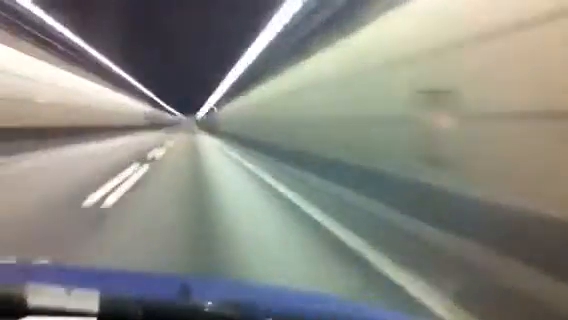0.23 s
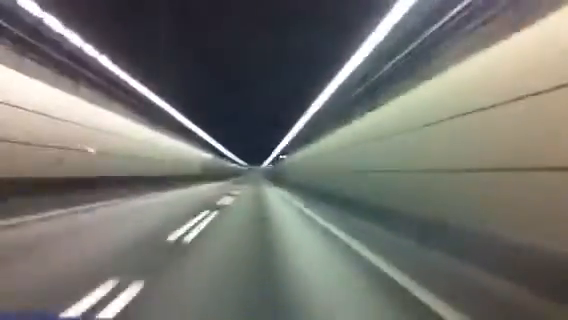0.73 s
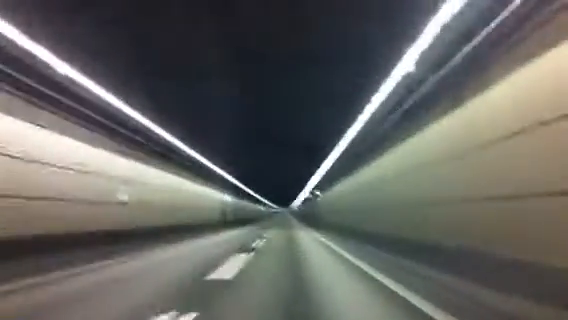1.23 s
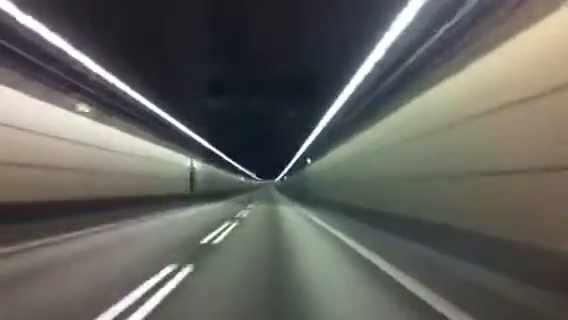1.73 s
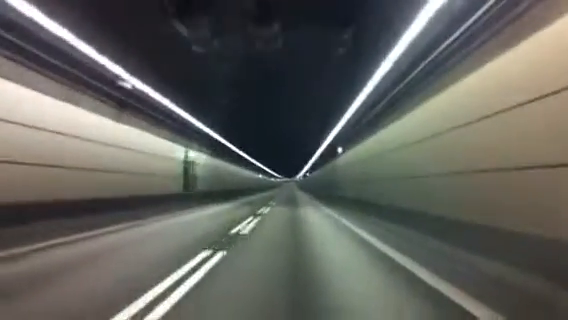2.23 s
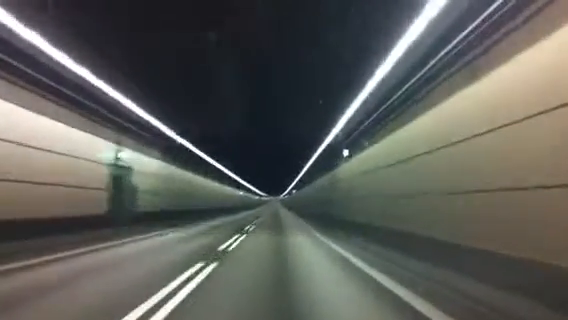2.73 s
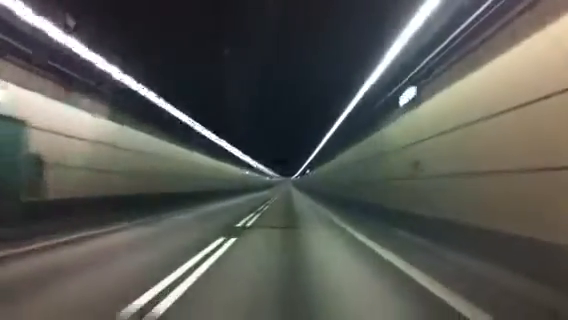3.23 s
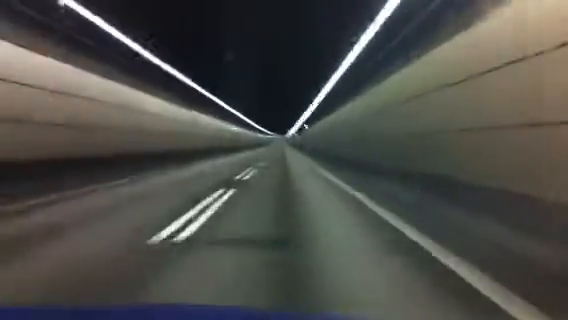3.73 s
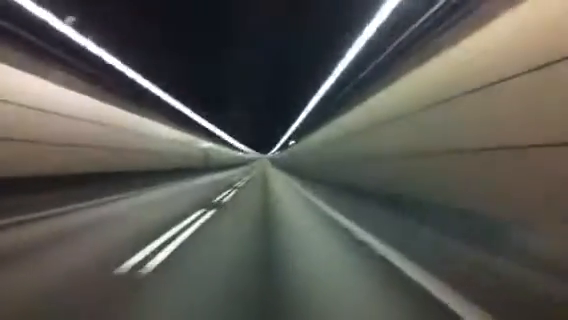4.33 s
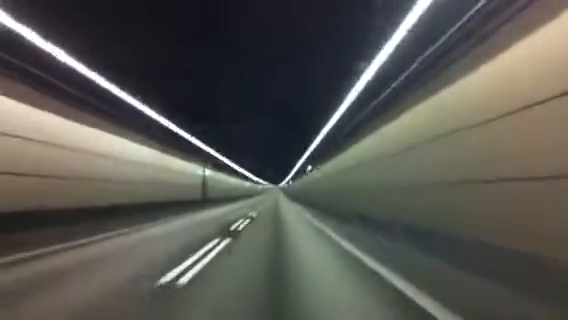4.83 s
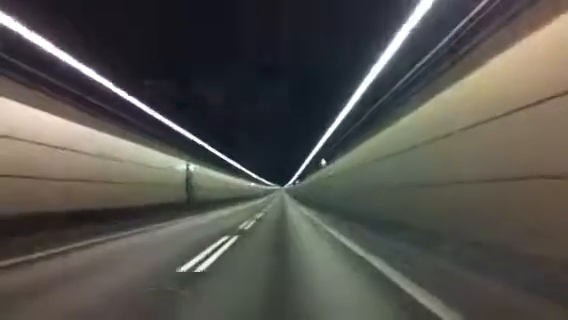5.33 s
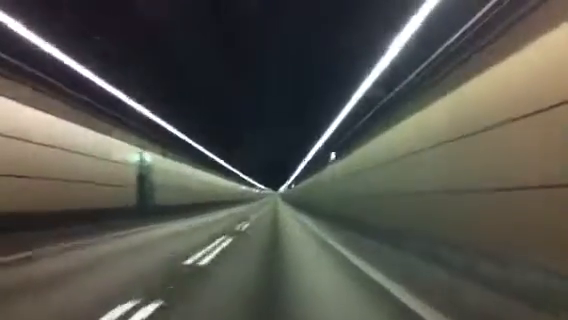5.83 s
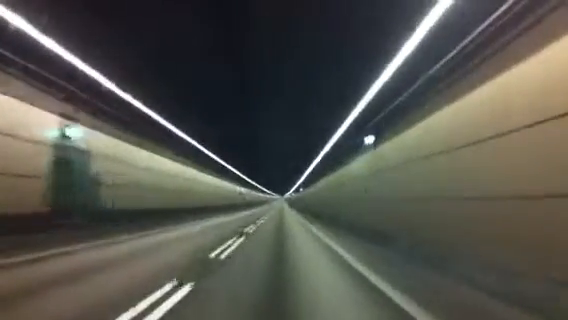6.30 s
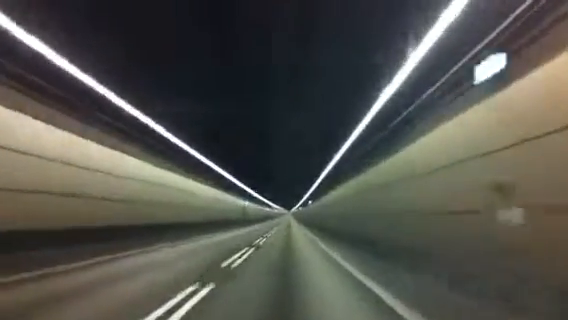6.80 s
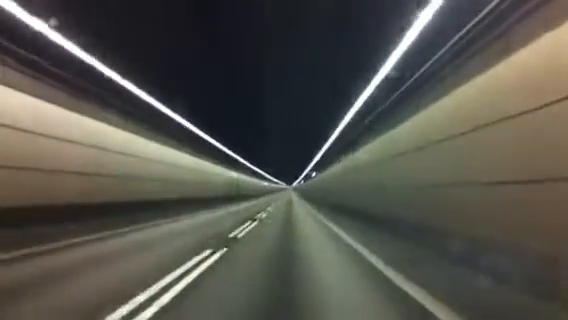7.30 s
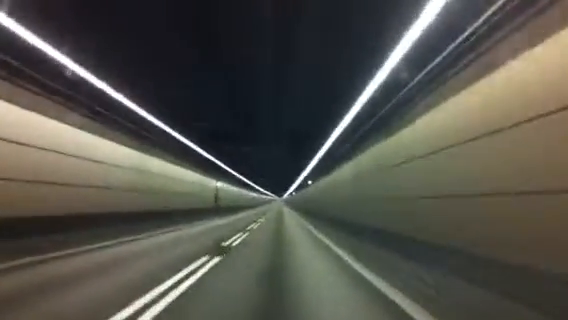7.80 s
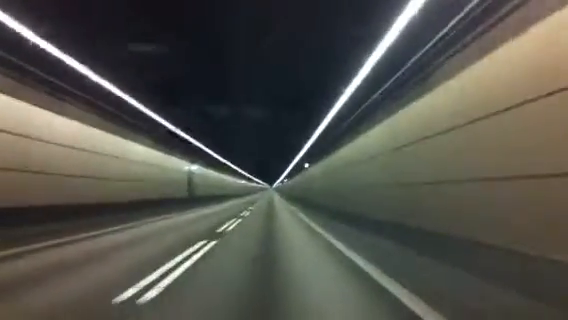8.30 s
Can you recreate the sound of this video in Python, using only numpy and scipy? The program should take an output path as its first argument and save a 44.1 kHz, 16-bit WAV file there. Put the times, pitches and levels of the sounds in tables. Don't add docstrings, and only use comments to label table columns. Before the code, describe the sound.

Inside a car speeding through a road tunnel: deep steady cabin boom and tyre roar, faint airy hiss, and a small bunch of metal jingling in quick light shakes.

```python
import sys
import numpy as np
from scipy import signal
from scipy.fft import rfft, irfft
from scipy.io import wavfile
from scipy.ndimage import uniform_filter1d, minimum_filter1d

SR = 44100
rng = np.random.default_rng(int(sys.argv[2]) if len(sys.argv) > 2 else 0)


def materialize(psi):
    bounded = np.clip(np.atleast_2d(psi).T, -1, 1)
    quanta = np.round(bounded * 32767).astype(np.int16)
    wavfile.write(sys.argv[1], SR, quanta)


def magnitude_from_level(level_db):
    exponent = np.asarray(level_db, float) / 20
    return 10 ** exponent


N = 377055
TIME = np.arange(N) / SR
HZ = np.fft.rfftfreq(N, 1 / SR)

# (dB per dB of road shake, dB gained when lifted, dB gained on coarse asphalt)
THUD, BOOM, UPPER, DRONE = (0.68, .3, 1.3), (0.84, 0.42, -1.5), (1.0, .3, 0.64), (0.52, -1.2, 1)
GLASS, ROAR, SIZZLE = (0.32, 3.7, 0.3), (0.041, 3.3, 0.23), (.05, 8.6, 0.47)
HIGH_HUM, LOW_HUM = (.3, 3.3, -1.0), (0.52, 2, 0.52)
RUSH, HISS, TOP = (.05, 2.7, 0.95), (.05, .1, .3), (.05, .1, .1)


def level(x, db):
    return x * magnitude_from_level(db) / np.sqrt(np.mean(x ** 2))


def curves(table):
    s, *columns = np.transpose(table)
    return [np.interp(TIME, s, column) for column in columns]


def step(at_s, fade_s):
    return np.clip((TIME - at_s) / fade_s + .5, 0, 1)


def swell(at_s, length_s):
    return np.exp(-((TIME - at_s) / length_s) ** 2)


def walk(rate):
    hold = int(SR / rate)
    levels = np.repeat(rng.standard_normal(N // hold + 1), hold)
    smooth = uniform_filter1d(uniform_filter1d(levels, hold), hold)
    return 1.25 * smooth[:N]


def follow(layer):
    # (time [s], shake [dB])
    road = [(0, -32.5), (.5, -34.5), (1.2, -35), (2.0, -31.5), (2.5, -33), (3.4, -31.5), (4.4, -31),
            (5.5, -31.5), (6.0, -32), (6.5, -34.5), (7.0, -32.5), (7.6, -32), (8.55, -31)]
    # (time [s], share in view of the glass [0-1])
    lift = [
        (0, 0),
        (.42, 0.07),
        (.6, 0.56),
        (1.1, 0.9),
        (1.7, 0.81),
        (3.7, 0.88),
        (5.3, 0.86),
        (6.2, 1.09),
        (8.55, 0.92),
    ]
    per_shake, lifted, coarse = layer
    shake = curves(road)[0]
    height = curves(lift)[0]
    coarser = step(3.53, fade_s=0.22)
    return per_shake * (shake - shake.mean()) + lifted * (height - 1) + coarse * coarser


def colour(points):
    hz, db = np.transpose(points)
    return np.interp(np.log(HZ + 1), np.log(hz), db)


def resonance(hz, width):
    return 1 / (1 + (2 * (HZ - hz) / width) ** 2)


def cabin():
    # (frequency [Hz], level [dB])
    broad = [(15, -72), (27, -35), (64, -23.5), (117, -5.5), (224, 1), (267, -3), (450, -9), (524, -11.5),
             (637, -8.5), (741, -10), (1520, -25), (2500, -28.5), (3540, -42.5), (4500, -51.5), (5850, -81),
             (9900, -120)]
    # (frequency [Hz], width [Hz], level over the colour [dB])
    modes = [(96, 7, 3.5), (124.5, 15.5, 5.5), (170.8, 31, 3.5), (199, 13, -3), (219.5, 12, 1.5),
             (267, 3.8, -5), (455, 81, 2), (525, 32, -3.5), (579, 24, 3.5), (595, 29, -6), (650, 32, 0.5),
             (719, 48, -3), (727, 26, 4), (787, 34, 2.5), (780, 18, 0), (850, 15, -2.5), (863, 30, 3),
             (950, 18, 5.5), (1166, 43, -3.5), (1220, 18, 1.5), (1320, 110, 0.1), (1553, 140, -2.5),
             (2100, 91, -3), (2220, 160, 2.5), (2760, 330, 3)]
    return colour(broad) + sum(db * resonance(hz, width) for hz, width, db in modes)


def noise(db, lo_hz, hi_hz, patchy_db, rate):
    def edge(hz):
        return np.clip(np.log2((HZ + 1) / hz) * 3 + .5, 0, 1)

    out = np.zeros(N)
    count = max(int(3 * np.log2(hi_hz / lo_hz)), 1)
    borders = np.geomspace(lo_hz, hi_hz, num=count + 1)
    for low, high in zip(borders, borders[1:]):
        strip = magnitude_from_level(db) * np.sqrt(np.maximum(edge(low) - edge(high), 0))
        wander = magnitude_from_level(patchy_db * walk(rate))
        out += wander * irfft(strip * rfft(rng.standard_normal(N)), N)
    return out


def played(db, zones, patchy_db, rate):
    return sum(magnitude_from_level(line - np.mean(line)) * noise(db, lo, hi, patchy_db, rate) for lo, hi, line in zones)


def body():
    zones = [(15, 100, follow(THUD)), (100, 190, follow(BOOM)), (190, 300, follow(UPPER))]
    return level(played(cabin(), zones, patchy_db=0.4, rate=3.6), -29.5)


def tyres():
    zones = [(300, 600, follow(DRONE)), (600, 1150, follow(GLASS)),
             (1150, 2050, follow(ROAR)), (2050, 3000, follow(SIZZLE))]
    return level(played(cabin(), zones, patchy_db=0.66, rate=1.457), -32.5)


def hums():
    near = swell(2.2, length_s=3.2)
    out = 0
    for layer, near_db, hz, width in [(HIGH_HUM, 8, 730.0, 29), (LOW_HUM, 5.5, 648, 18)]:
        ring = irfft(rfft(rng.standard_normal(N)) * resonance(hz, width), N)
        out = out + level(ring, -51.5) * magnitude_from_level(follow(layer) + near_db * near + 0.33 * walk(1.8))
    return out


def ridges():
    # (frequency [Hz], width [Hz], time [s], length [s], level [dB])
    swelling_bands = [(2426, 200, 1.37, 0.9, -55), (2290, 100, 3, 0.62, -68), (2410, 140, 4, .6, -56),
                      (1790, 170, 3.4, 1.3, -68), (1900, 140, 6.2, 2.2, -56.5), (638, 26, 5.44, 0.41, -46),
                      (644, 25, 7.83, 0.64, -45), (727, 15, 2.56, 0.53, -41), (2010, 300, .8, .3, -55),
                      (920, 56, 2.96, 0.22, -49), (179, 20, 1.36, 0.64, -37.5), (260, 50, 7.73, 0.53, -44),
                      (404, 130, 2.75, 0.78, -47), (1060, 120, 2.4, .9, -52), (1080, 200, 3.05, 0.13, -48),
                      (425, 60, 1.7, 1.04, -50), (274, 62, 7.56, 0.22, -36), (205, 32, 7.07, .15, -40),
                      (725, 12, 1.2, 0.52, -48), (787, 11, .95, 0.35, -47.5), (790, 16, 2.4, 0.38, -46.5),
                      (638, 25, 1.57, .15, -43), (760, 30, 2.9, 0.28, -46), (2280, 120, 1.02, .2, -57),
                      (2280, 120, 2, 0.21, -59), (580, 20, 6.6, 2.5, -51.5), (1320, 170, 5.9, 1.8, -59),
                      (2480, 90, 1.4, .4, -59), (202, 36, 1.81, 0.14, -40), (3400, 550, 3, .6, -71)]
    steady = .6
    out = 0
    for hz, width, s, length, db in swelling_bands:
        ring = irfft(rfft(rng.standard_normal(N)) * resonance(hz, width), N)
        flutter = np.sqrt(uniform_filter1d(ring ** 2, size=int(4 * SR / hz))) + 1e-9
        out = out + level(ring / flutter ** steady, db) * swell(s, length)
    return out


def air():
    # (frequency [Hz], level [dB])
    seal_colour = [(2350, -30), (4000, 3.5), (4620, -1.5), (6360, -4.5), (9220, -8.5), (15100, -9.5),
                   (15700, -10)]
    # (time [s], hiss gain [dB])
    jolts = [(.004, 4.5), (1.46, 2), (1.885, 3), (1.935, 1), (2.52, 3.5), (2.575, 1.5), (3.32, 3), (3.8, 3),
             (4.33, 2), (4.36, 3), (4.395, 5.5), (4.43, 1.5), (5.86, 2.5), (5.93, 5)]
    # (time [s], level [dB])
    draughts = [(0.0, -65.5), (0.12, -64), (0.62, -65.5), (1.07, -65), (1.43, -68), (1.88, -68.5),
                (2.19, -70), (3.95, -68), (4.14, -69), (4.57, -68), (4.98, -69.5), (6.12, -68),
                (8.19, -68.5), (8.55, -69.5)]
    jolt = sum(db * swell(s, length_s=0.017) for s, db in jolts)
    jolt = jolt * (1 + .2 * walk(200)) + walk(17) / 4
    vent = 3 * (1 - step(1.4, fade_s=0.42))
    draught = curves(draughts)[0]
    hiss = 0.79 * draught + jolt + follow(HISS)
    top = draught + 1.3 * jolt + follow(TOP)
    rush = vent + 0.87 * jolt + follow(RUSH)
    seals = played(colour(seal_colour), [(4400, 9000, hiss), (9000, 17000, top)], patchy_db=.6, rate=6)
    glass = played(cabin(), [(3000, 4400, rush)], patchy_db=.4, rate=5)
    return level(seals, -63.0) + level(glass, -60.5)


def shakes():
    # (time [s], ring level [dB],
    # loudest ring [Hz], high ring over it [dB], low ring over it [dB])
    bunch_shakes = [(0.045, -61.9, 11400.0, -6.8, -2.4), (0.112, -56, 11500, -8.4, -1),
                    (0.224, -57.8, 11100.0, -6.7, -2.3), (0.282, -60.6, 10400, -4.1, -1.7),
                    (0.331, -59.4, 11600.0, -6.6, -10.6), (0.395, -66.0, 12600.0, -2.1, -1.3),
                    (0.45, -64.9, 11700.0, -6.0, -5.5), (0.64, -60.9, 11700.0, -8.5, -7.4),
                    (0.74, -67.0, 12100.0, -2.6, -0.6), (0.822, -67.5, 12000.0, -0.1, 0.2),
                    (0.878, -67.3, 9900.0, -1.1, 6), (0.905, -69.3, 9900.0, 2.3, 1.5),
                    (0.977, -62.8, 12300.0, -8.6, -2.5), (1.017, -62.7, 11400.0, -8.0, -6.8),
                    (1.061, -63.6, 10500.0, -4.6, -6.9), (1.12, -63.3, 11100.0, -5.3, -2.5),
                    (1.171, -65.6, 11600.0, -3.4, 0.7), (1.234, -64.2, 10900.0, -0.9, 0.3),
                    (1.331, -66.3, 11500.0, -11.3, -1.7), (1.455, -72.0, 12400.0, 3.8, 7.8),
                    (1.512, -70.8, 11500.0, -7.1, -0.1), (1.643, -61.3, 10100.0, -3.2, -5.9),
                    (1.7, -63.4, 10100.0, -1.4, -2.3), (1.816, -62.9, 11200.0, -2.4, -10.3),
                    (1.877, -63, 10300, -3.9, -0.3), (1.926, -65, 10700.0, -6.1, 1.0),
                    (1.975, -68.5, 11900.0, -5.4, -5.1), (2.107, -71.2, 12700.0, -4.4, -0.6),
                    (2.157, -72.8, 10100.0, -10.5, -1.3), (2.207, -73.2, 9900.0, -5.0, 0.1),
                    (2.443, -63, 11100.0, -12.3, -8.2), (2.507, -62, 11600.0, -4.1, -4),
                    (2.566, -62.0, 9800.0, -3.8, 0.9), (2.948, -73.9, 10800.0, -2.2, 1.2),
                    (3.202, -64, 12200.0, -1.4, -0.3), (3.249, -66.2, 10600.0, -12.2, -6.7),
                    (3.311, -61, 11300.0, -9.1, -1), (3.364, -63.9, 10700.0, -4.9, -2.7),
                    (3.417, -68.4, 11400.0, -3.2, -0.1),
                    (3.735, -64.5, 10600.0, -5.1, -0.3), (3.794, -67, 11300.0, -3.1, 0.5),
              (3.853, -61.6, 11400.0, -3.8, 2), (3.913, -60.0, 11300.0, -8.0, -5.6),
              (3.967, -63.8, 11600.0, -8.2, -1.0), (4.087, -63, 11100.0, -6.5, -1.5),
              (4.248, -72.6, 9700.0, -0.0, 6.6), (4.313, -60.8, 10900.0, -3.6, -2.6),
              (4.373, -59.6, 11700.0, -0.5, -3), (4.425, -62.2, 11100.0, -4.1, -3.3),
              (4.48, -66.0, 11200.0, -5.1, -1.2), (4.529, -68.0, 11400.0, -6.1, -1.6),
              (4.589, -63.9, 11200.0, -11.5, -3.5), (4.636, -67.3, 11300.0, -3.8, -0.2),
              (4.69, -64.7, 11100.0, -7.2, -1.9), (4.746, -63, 11100.0, -6.4, -5.5),
              (4.8, -61.4, 11300.0, -12.6, -3.6), (4.858, -64.9, 11300.0, 0.3, -2.4),
              (4.99, -69.0, 11700.0, -13.1, -4.3), (5.169, -70.8, 9900.0, -9.2, -1.4),
              (5.413, -71.1, 9900.0, -8.1, -1.9),
                    (5.642, -72.2, 9700.0, -3.1, 0.9), (5.753, -67.2, 11300.0, -5.6, -2.0),
            (5.811, -66, 11200.0, -9.4, 0.8), (5.869, -62.9, 11100.0, -3.8, 2.9),
            (5.927, -65, 10700.0, -2.9, 2.4), (5.986, -67.8, 11700.0, -6.0, 1.3),
            (6.115, -63.9, 11700.0, -6.1, 0.4), (6.306, -64.2, 11800.0, -11.4, -4.1),
            (6.429, -63, 11800.0, -8.6, 2), (6.535, -64.8, 11700.0, -11.5, -7.7),
            (6.587, -62.6, 11900.0, -12.3, -9.9), (6.711, -63, 11800.0, -10.5, -5.5),
            (6.768, -62.4, 11300.0, -6.1, -1.0), (6.812, -67, 11700.0, -4.3, 0.4),
            (6.869, -64.1, 10400.0, -3.1, 2.7), (7.099, -64, 9700.0, -8.6, -2.2),
            (7.158, -61.3, 11800.0, -10.8, -0.6), (7.216, -61.8, 11600.0, -7.7, 0.1),
            (7.472, -61.8, 11200.0, -9.7, -3.0), (7.529, -62.2, 11800.0, -5.8, -2.6),
            (7.58, -64, 11700.0, -18.5, -7.4), (7.722, -69.7, 11900.0, -4.5, 1.1),
            (7.964, -71.3, 9800.0, -3.0, 5.5), (8.13, -65.2, 11800.0, -16.5, -4.7),
            (8.186, -62.6, 11700.0, -8.6, -4.0), (8.429, -72.7, 12000.0, -3.8, -0.3),
                    (0.0, -63, 12000, -10, -8),
        (4.346, -64, 11400, -3, -2),
    ]
    rows = bunch_shakes
    draws = rng.random((len(rows), 3, 24, 3))
    return [(s, db + 9.5, hz, high_db - 1, low_db - 2, draw)
            for (s, db, hz, high_db, low_db), draw in zip(rows, draws)]


def struck(hz, t, t60, rise_s):
    return np.sin(2 * np.pi * hz * t) * np.exp(-np.log(1000) * t / t60) * (1 - np.exp(-t / rise_s))


def jingles():
    out = np.zeros(N + SR)
    t = np.arange(SR // 12) / SR
    for s, db, hz, high_db, low_db, draws in shakes():
        i = max(int((s - .001) * SR), 0)
        # (middle Hz, spread Hz, level dB, ring time s)
        clusters = [(.5 * (hz + 10900), 2800, db - 2.0, .028),
                    (15000, 1500, db + high_db, .035),
                    (5900, 3000, db + low_db, .03)]
        for (mid_hz, spread_hz, ring_db, t60), draw in zip(clusters, draws):
            pitch = mid_hz + spread_hz * (draw[:, :1] - .5)
            since = np.maximum(t - 0.012 * draw[:, 1:2], 0)
            ring = struck(pitch, since, t60, rise_s=0.0005)
            out[i:i + len(t)] += magnitude_from_level(ring_db - 11.5) * ((.3 + draw[:, 2:]) * ring).sum(axis=0)
        out[i:i + len(t)] += magnitude_from_level(db - 4.0) * struck(hz, t, t60=0.064, rise_s=.003)
    return out[:N]


def scene():
    return (body() + tyres() + hums() + ridges() + air() + jingles())[None]


def thin_treble(x):
    # (frequency [Hz], level against surroundings [dB])
    limits = [(3600, -4.6), (5000, -3.6), (6500, -2.5), (9000, -1.5), (15500, -1.3)]

    def blur(p, bins, frames):
        return uniform_filter1d(uniform_filter1d(p, size=bins, axis=-2), size=frames, axis=-1)

    hz, _, z = signal.stft(x, SR, nperseg=1024)
    power_db = 20 * np.log10(np.abs(z) + 1e-10)
    dip_db = blur(power_db, 4, 4) - blur(power_db, 25, 5)
    treble_db = uniform_filter1d(power_db[:, hz > 9000].mean(axis=-2), size=25)
    sink_db = .25 * (treble_db.mean() - treble_db)[:, None]
    shut = dip_db < np.interp(hz, *np.transpose(limits), left=-99)[:, None] + sink_db
    wide = -minimum_filter1d(-1. * shut, size=2, axis=-2)
    return signal.istft(z * magnitude_from_level(-26 * wide), SR, nperseg=1024)[1][:, :N]


def roll_off(x):
    return signal.sosfilt(signal.butter(12, 15800, fs=SR, output="sos"), x)


def record(dry):
    rounded = np.tanh(2.472 * dry) / 2.53
    fade = 1 - step(N / SR - .0015, fade_s=.003)
    return roll_off(thin_treble(rounded) * fade)


dry = scene()
out = record(dry)
materialize(out)
```